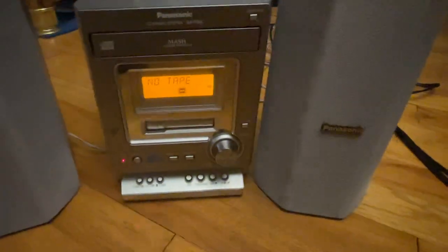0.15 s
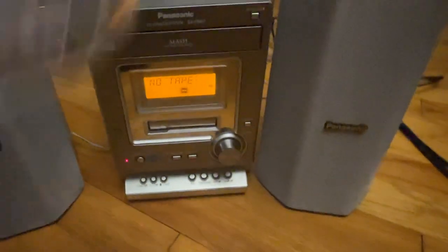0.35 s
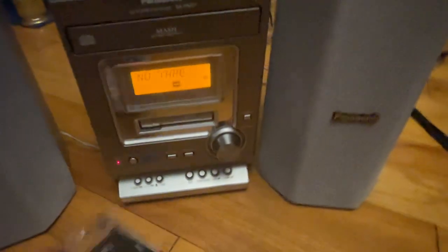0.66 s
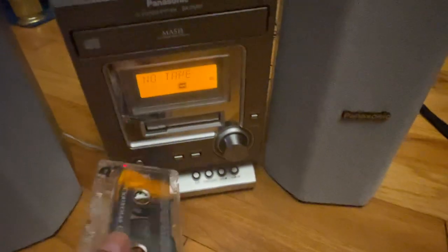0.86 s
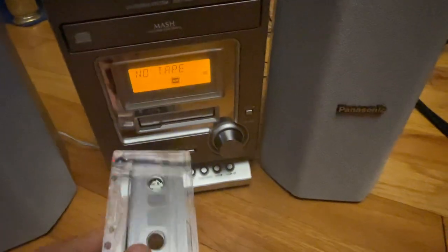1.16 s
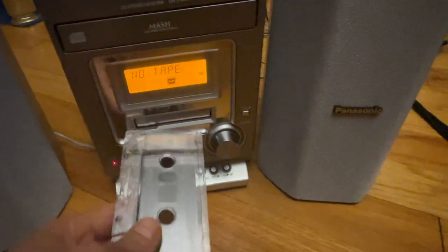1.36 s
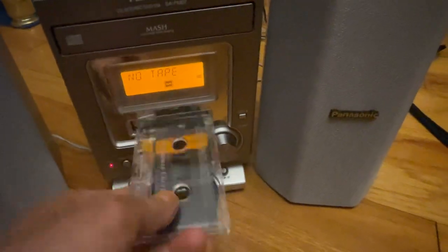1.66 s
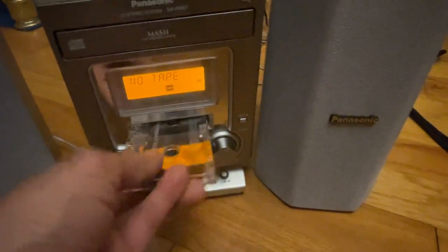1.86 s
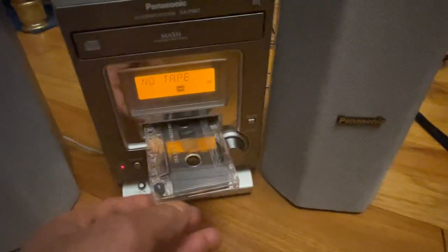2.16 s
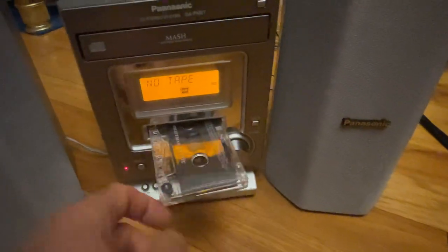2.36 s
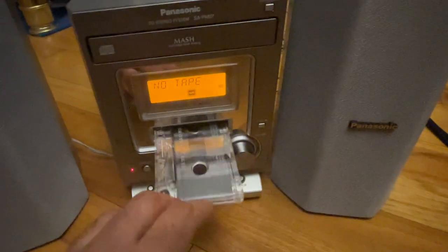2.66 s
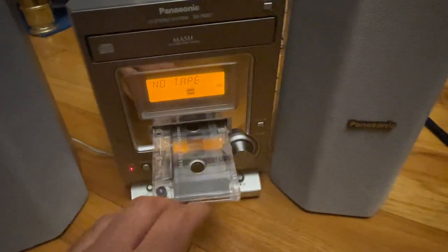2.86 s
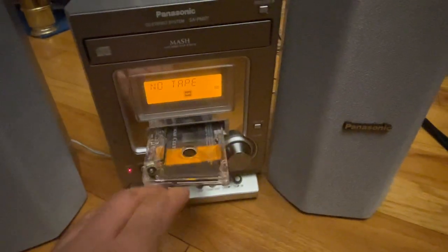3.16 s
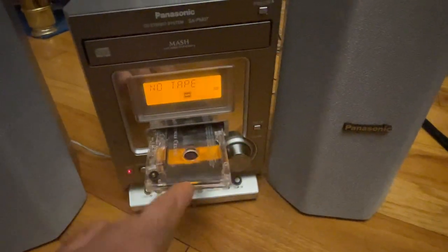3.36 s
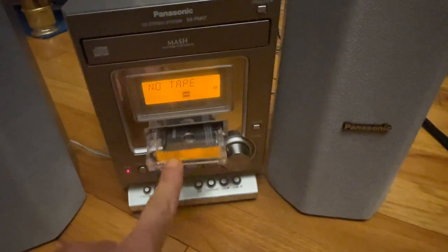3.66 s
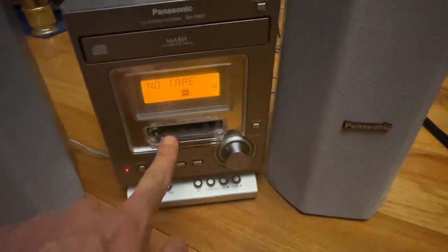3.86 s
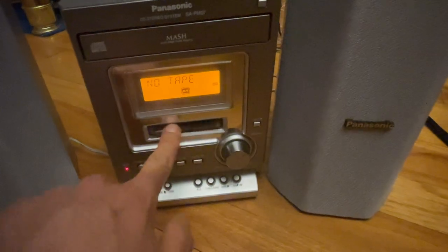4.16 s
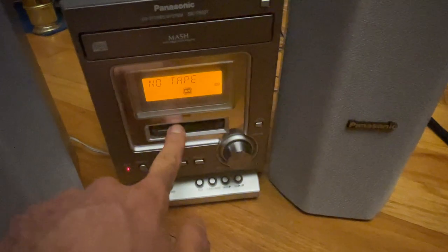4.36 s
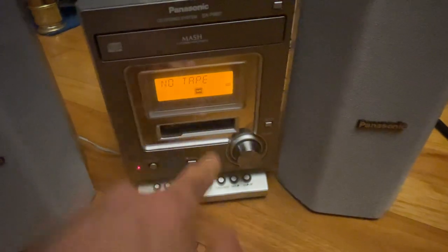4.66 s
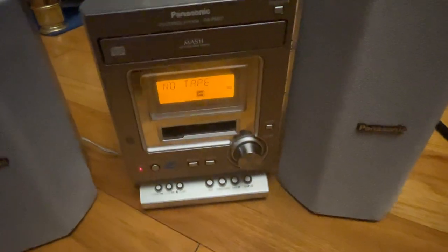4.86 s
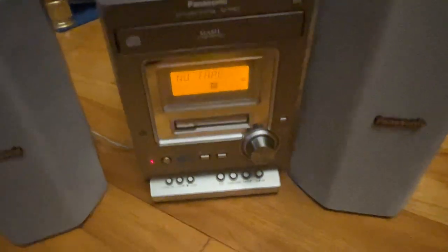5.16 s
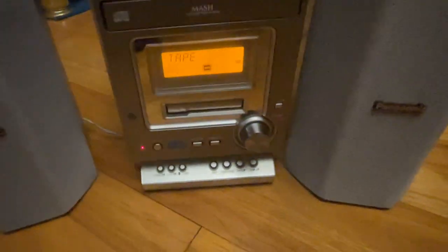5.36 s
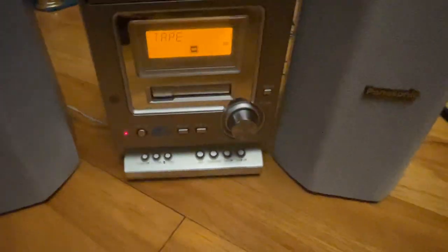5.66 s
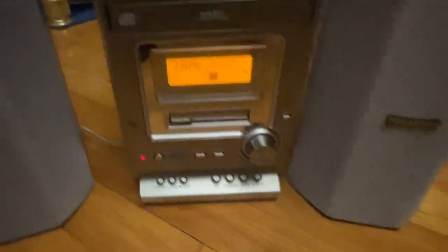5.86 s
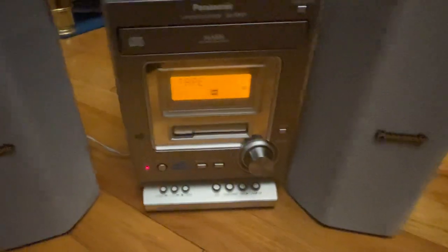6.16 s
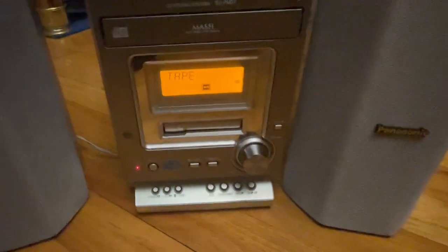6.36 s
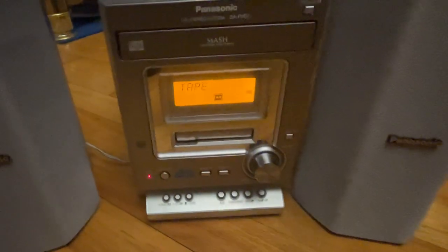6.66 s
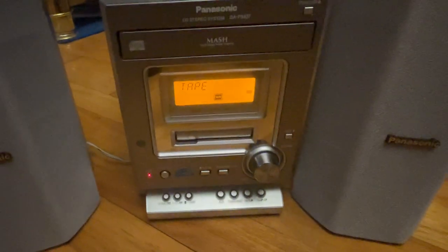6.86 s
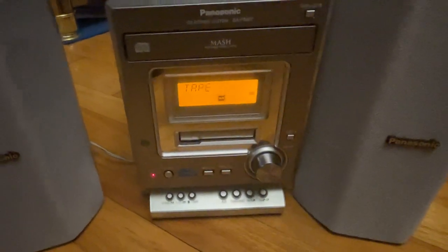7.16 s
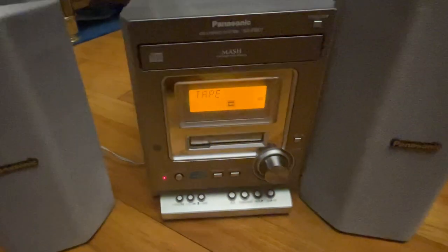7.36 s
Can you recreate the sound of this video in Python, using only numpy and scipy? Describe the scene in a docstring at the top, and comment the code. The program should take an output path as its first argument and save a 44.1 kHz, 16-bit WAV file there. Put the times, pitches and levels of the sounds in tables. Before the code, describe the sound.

A cassette shell is turned in the fingers with soft rustles, then knocks sharply against a plastic slot in a quick uneven clatter. Spaced clicks, short scrapes and knocks continue while it is pushed home. A loading motor whirrs very softly, and the mechanism drops with clacks and a dull thud. The room is quiet, with low rumble and a short reverb; microphones are close, the left hearing it slightly first. A small tap ends it.

```python
"""A cassette drawn into a deck

A plastic cassette is turned in the hand, fiddled into the slot of a deck on a wooden floor and pushed in;
the loading motor draws it in and the mechanism drops it home with a thump. Contacts are noise bursts
ringing resonant modes, tocks, hums and thumps are sines, and rubbing and whirr are shaped noise.
A quiet room rumbles and hisses. The sound reaches the left microphone a little before the right.
"""
import sys
import numpy as np
from scipy import signal
from scipy.fft import rfft, irfft, next_fast_len
from scipy.io import wavfile
from scipy.ndimage import uniform_filter1d, map_coordinates

SR = 44100
rng = np.random.default_rng(int(sys.argv[2]) if len(sys.argv) > 2 else 0)


def gain_from_db(level_db):
    """Turn a decibel level (scalar or array-like) into a linear amplitude factor."""
    decades = np.asarray(level_db, float) / 20
    return 10 ** decades


def store_wav(level_fs):
    """Save 16-bit WAV to argv[1]."""
    pcm = np.round(np.clip(np.atleast_2d(level_fs), -1, 1) * 32767)
    wavfile.write(sys.argv[1], SR, pcm.T.astype(np.int16))


N = 331191  # length [samples]

# rumble of the house: (time [s], level [dB])
HOUSE_RUMBLE = [(0, -58), (1.15, -63.5), (2.3, -59.5), (4.3, -57.5), (5.4, -59), (6.6, -61.5), (7.5, -60.5)]
# relative spectra of rumble, drone and hiss: (frequency [Hz], density [dB])
DEEP_SPECTRUM = [(20, -32.5), (27, -35), (42, -8), (65, -3), (155, -13), (170, -34), (370, -120)]
DRONE_SPECTRUM = [(82, -61), (140, 3), (236, 5.5), (259, -1), (366, -5), (443, -27), (600, -28),
                  (1320, -120)]
HISS_SPECTRUM = [(260, -23.5), (450, -8.5), (596, -13), (1310, -19.5), (13000, -26)]
# brief swells of the drone: (start [s], length [s], level [dB])
DRONE_SWELLS = [(1.654, 0.52, -58), (5.287, 0.22, -58)]
HISS_DB, DRONE_OVER_DEEP_DB = -79.5, -4.5
SWELL_RISE_DB_PER_S, SWELL_FADE_DB_PER_S = 307, 112.5

# plastic rubbing on skin, slot and guides: (start [s], length [s], hiss level [dB], body over hiss [dB])
RUB_STROKES = [(0, 0.057, -63.5, 1), (0.114, 0.11, -70, 3.5), (0.244, 0.034, -62.5, -10),
               (0.32, 0.11, -70, -10.5), (0.421, 0.046, -62, -4), (0.49, 0.17, -79, 0),
               (0.663, 0.093, -56, -10), (0.812, 0.13, -60, -12), (1.012, 0.083, -64, -29),
               (1.62, 0.11, -56, -3.5), (1.891, 0.029, -44.5, -6.5), (1.95, 0.092, -66, 7.5),
               (2.034, 0.082, -52, 3.5), (2.084, 0.18, -67.5, 10.5), (2.484, 0.13, -57.5, 3),
               (2.739, 0.097, -64.5, 6.5), (3.057, 0.05, -52, 4.5), (3.15, 0.17, -64, 8.5),
               (3.428, 0.047, -69, 6.5), (3.56, 0.09, -75, -3), (3.633, 0.049, -59, -0.5),
               (3.736, 0.22, -62, 3), (3.845, 0.14, -64, -0.5), (3.99, 0.18, -72, 2),
               (4.174, 0.013, -42.5, 2), (4.227, 0.12, -68, 8), (4.368, 0.41, -65.5, 2.5),
               (5.129, 0.19, -51.5, 4), (5.311, 0.059, -71.5, 18.5), (5.726, 0.059, -76.5, -2.5),
               (6.062, 0.068, -72.5, 0), (6.332, 0.044, -64, -5.5), (7.257, 0.05, -60, 6),
               (7.377, 0.17, -77, 1)]
# loading motor: (start [s], length [s], hiss level [dB], body over hiss [dB])
MOTOR_WHIRRS = [(4.637, 0.048, -56.5, -4), (4.828, 0.64, -70, 4.5), (5.458, 1.22, -81, 2.5)]
# relative spectrum of the sliding noise: (frequency [Hz], density [dB])
SLIDE_SPECTRUM = [(900, -41), (1500, -11), (2300, -5), (3300, -10.5), (5000, -4), (6400, -12),
                  (8100, -10.5), (10000, -15), (13000, -21.5)]
RUB_RISE_DB_PER_S, RUB_FADE_DB_PER_S = 697.5, 252

# modes of shell and slot: (frequency [Hz], least width [Hz], relative level [dB])
SHELL_MODES = [(265, 39, 4.5), (400, 4, 2.5), (448, 110, -1), (833, 86, -2), (958, 80, -4),
               (1480, 530, 1.5), (2350, 310, -9), (3760, 1100, -2.5), (5610, 440, 1.5), (6220, 88, 7),
               (7200, 390, 0), (10500, 2900, 1.5), (12850, 200, 2.5)]
# how the cassette sits, from each time on:
# (time [s], pitch of the hollow it leaves [Hz], hollow level [dB], ring of the shell [dB])
SEATING_STATES = [(0, 2030, 4, -5), (1.4, 2384, 1.5, 2.5), (2.1, 3790, 8.5, 3), (2.51, 2210, -6, 2),
                  (2.71, 3040, 5.5, -1.5), (2.9, 2350, -18.5, 3), (3.6, 2296, 8.5, -2),
                  (4.0, 2350, -2.5, -2), (5.2, 3360, 13, -2.5), (5.24, 2500, -9, -1.5),
                  (5.5, 1690, 5, -11.5)]
HOLLOW_WIDTH_HZ, HOLLOW_UNDER_HISS_DB = 220, -11

# contacts where one hollow note stands clear: (time [s], level before decay [dB], pitch [Hz], t60 [s])
TOCK_NOTES = [(0.109, -50.5, 1880, 0.053), (0.268, -44, 1487, 0.04), (.684, -44, 624, 0.039),
              (.75, -41.5, 2044, 0.072), (.82, -38.5, 2050, 0.024), (1.087, -45, 1257, .03),
              (1.474, -30.5, 265, 0.079), (1.609, -33, 265, 0.068), (1.729, -26.5, 445, 0.051),
              (1.771, -30, 265, 0.17), (1.806, -30.5, 265, 0.11), (1.937, -39, 265, 0.13),
              (2.06, -16, 940, .05), (2.066, -39, 140, .2), (2.725, -29.5, 539, 0.048),
              (3.271, -44, 376, 0.32), (3.277, -42.5, 237, 0.14), (4.216, -30.5, 265, 0.079),
              (4.523, -42, 422, 0.064), (5.153, -31, 252.6, 0.072), (5.283, -41.5, 177.5, 0.4),
              (5.712, -53, 880, 0.033), (5.835, -44.5, 760, 0.029), (7.252, -20.5, 1495, 0.0076),
              (7.255, -37.5, 221, 0.051), (7.38, -42.5, 250, 0.094)]
TOCK_RISE_CYCLES = 1

# contacts of shell, flap and mechanism:
# (time [s], loudest 4 ms of click band [dB], weight [dB], snap over click [dB], rattle t60 before limits [s])
CONTACT_EVENTS = [(0.267, -71, -6, -5, 0.027), (0.461, -62, 0, 10, 0.014),
                  (0.666, -53.5, -1.5, 12.5, 0.043), (0.686, -58.5, -14, 8, 0.095),
                  (0.724, -58, -10, 6.5, 0.057), (0.744, -38.5, -16, 5.5, 0.031),
                  (0.774, -69, -20, 21.5, 0.019), (0.823, -50, -16, -9, 0.014),
                  (1.086, -61, -11, -3.5, 0.026), (1.469, -44.5, 4, -6, 0.05), (1.504, -53, -3, 5, 0.026),
                  (1.605, -44, 5, -2.5, 0.026), (1.641, -44, 8, 3.5, 0.037), (1.656, -43.5, 0, 2, 0.034),
                  (1.726, -40.5, 11, -1.5, 0.038), (1.746, -41.5, -15, 1.5, 0.046),
                  (1.765, -29, -0.5, -1, 0.03), (1.779, -50, 0, -7, 0.03), (1.801, -36, 3.5, 2, 0.04),
                  (1.852, -41.5, 0.5, -5.5, 0.04), (1.916, -34, -1.5, 2, 0.065),
                  (1.935, -33.5, -1, 0, 0.03), (1.978, -44, -1, 0, 0.063), (2.026, -48.5, 4, 3, 0.07),
                  (2.046, -31.5, -8, 0, 0.079), (2.053, -32.5, -4, 4.5, 0.055), (2.06, -29, -2, -10, 0.076),
                  (2.065, -25, -10, 2, 0.027), (2.123, -33.5, -5, -1, 0.048),
                  (2.161, -41.5, -0.5, 5, 0.048), (2.187, -44.5, -4, -4, 0.014),
                  (2.359, -65.5, 12, -2.5, 0.043), (2.472, -38.5, -1.5, 1, 0.035),
                  (2.494, -65.5, 17.5, 6, 0.17), (2.531, -43.5, 2, 2, 0.029), (2.589, -50, 4, 1, 0.045),
                  (2.636, -55.5, 4.5, -1.5, 0.083), (2.697, -47, 2.5, 2, 0.049),
                  (2.723, -34.5, 2.5, 0.5, 0.02), (2.728, -34, -0.5, 5, 0.029), (3.029, -52, 5, 1, 0.062),
                  (3.047, -41, -2.5, -10, 0.036), (3.084, -45.5, 3, 8, 0.015),
                  (3.102, -49.5, 0, 12.5, 0.041), (3.107, -31.5, -2, 2.5, 0.044),
                  (3.23, -53.5, -12, -2, 0.043), (3.251, -46.5, 0.5, -8, 0.067), (3.267, -44, 1, 0, 0.052),
                  (3.42, -61.5, 8.5, -1.5, 0.076), (3.662, -47.5, -3.5, -4, 0.061),
                  (3.685, -54.5, 5.5, 0, 0.12), (3.712, -53, 0.5, 2.5, 0.097),
                  (3.769, -40.5, -28, 0, 0.015), (3.885, -41, -18, 1.5, 0.073),
                  (3.892, -37, -8, -2, 0.0286), (3.907, -38.5, -6, -7, 0.027), (3.92, -51.5, 4, 2, 0.16),
                  (4.068, -78, 22.5, -15, 0.19), (4.17, -34, -3.5, 0.5, 0.054),
                  (4.222, -48, 5.5, -10, 0.022), (4.266, -41.5, -26, -4, 0.019),
                  (4.376, -48.5, -0.5, 2.5, 0.045), (4.476, -28.5, -7.5, -2.5, 0.031),
                  (4.516, -34, 2, -8, 0.048), (4.597, -47, 3.5, -6, 0.24), (4.616, -45.5, 3, 6.5, 0.051),
                  (4.623, -34, -3.5, 0.5, 0.04), (4.637, -43.5, 0, 6, 0.14), (5.02, -60.5, 0, -8, 0.061),
                  (5.083, -53.5, -3, -13, 0.041), (5.124, -39, -0.5, -18, 0.018),
                  (5.131, -33, -4.5, -2.5, 0.13), (5.149, -34, -0.5, 0.5, 0.029),
                  (5.212, -35.5, -15, -4.5, 0.021), (5.255, -36, -2, -1, 0.11),
                  (5.264, -26.5, -7, -7, 0.052), (5.277, -44.5, 5.5, 7, 0.061),
                  (6.323, -51.5, -15, 1, 0.012), (7.219, -63.5, -1.5, -17.5, 0.026),
                  (7.253, -60, -2, -10, 0.0062), (7.384, -57.5, -13, 0.5, 0.008)]
# limits of the knock, clack, click, snap and fizz bands: (edge [Hz])
CONTACT_BAND_EDGES = [200, 600, 1500, 4000, 9000, 16000]
# additional decay of those five bands, faster in the higher ones: (decay [dB/s])
BAND_DAMPING = [0, 100, 250, 500, 600]
# a heavy contact lifts the lowest band most
KNOCK_PER_WEIGHT, CLACK_PER_WEIGHT, KNOCK_DB = 1.3, 0.44, -2
FIZZ_DB, FIZZ_PER_EDGE = -9, 2  # a sharp edge lifts the highest band most
MODE_SCATTER_DB = 2  # from hit to hit

# faint pure hums: (start [s], length [s], rms level [dB], pitch [Hz])
HUM_SWELLS = [(.92, 0.029, -61, 223.3), (1.06, 0.035, -60.5, 217), (1.113, 0.073, -66.5, 199.3),
              (6.674, 0.052, -58, 234)]

# jolts of the cabinet: (time [s], level to which the modes are relative [dB])
CABINET_JOLTS = [(3.116, -45.5), (4.215, -50), (4.631, -48.5), (5.138, -50.5), (5.275, -36), (7.256, -53.5),
                 (7.38, -57)]
# modes of the cabinet on the floor boards: (frequency [Hz], relative level [dB], t60 [s])
CABINET_MODES = [(74.8, 2.5, 0.48), (137.6, 5, 0.26), (275, -8, 1), (393, -17, 0.97)]

# decay of the room: (frequency [Hz], t60 [s])
ROOM_DECAY = [(200, 0.64), (1000, 0.18), (4000, 0.15), (12000, 0.063)]
ROOM_LOW_HZ = 280  # below this the two sides hear little separate echo

# balance, left over right: (frequency [Hz], gain [dB])
LEFT_OVER_RIGHT = [(250, -0.9), (700, 2.5), (2500, 0), (5000, 0.7), (9000, -0.37)]
# response of both microphones: (frequency [Hz], gain [dB])
MICROPHONE_RESPONSE = [(12600, 1.5), (13400, 0), (14700, -18.5), (15700, 1.5), (16300, -33.5)]
# phase lead of left over right: (frequency [Hz], lead [samples])
LEFT_PHASE_LEAD = [(300, 15), (1380, 13.96), (3100, 17.76), (3960, 16.1), (4650, 18.3), (5680, 19.5),
                   (7060, 21), (13000, 18.6)]


def unit(x):
    """Power normalisation: scales a signal to rms 1."""
    return x / np.sqrt(np.mean(x ** 2) + 1e-20)


def along(points, hz):
    """Logarithmic frequency scale: reads (Hz, value) points by interpolation in log frequency."""
    f, v = np.transpose(points)
    return np.interp(np.log(hz + 1), np.log(f + 1), v)


def wobble(rate):
    """Slow random modulation: a smooth curve through random knots, rate of them a second."""
    knots = rng.standard_normal(int(N * rate / SR) + 4)
    return map_coordinates(knots, [np.arange(N) * rate / SR])


def filtered(x, response):
    """Linear filtering: multiplies the spectrum by a complex response of frequency."""
    m = next_fast_len(N + SR // 2)
    return irfft(rfft(x, m) * response(np.fft.rfftfreq(m, 1 / SR)), m)[..., :N]


def resonance(hz, centre_hz, width_hz):
    """Damped harmonic oscillator: causal response of one mode, 1 at its centre."""
    return 1j * hz * width_hz / (centre_hz ** 2 - hz ** 2 + 1j * hz * width_hz)


def rush(gain, alike):
    """Partial coherence: stereo noise of rms 1 whose power share alike is common to both sides."""
    noise = rng.standard_normal((3, N))
    share = np.clip(alike, 0, 1)
    both = np.sqrt(share) * noise[0] + np.sqrt(1 - share) * noise[1:]
    return unit(filtered(both, gain))


def strokes(start, length, db, rise_db_per_s, fade_db_per_s):
    """Exponential growth and decay: summed envelopes that swell, hold for their length and fade."""
    step = 44  # samples between computed points
    at = np.arange(0, N + step, step)
    t = at / SR - start[:, None]
    before, after = np.maximum(-t, 0), np.maximum(t - length[:, None], 0)
    under_db = rise_db_per_s * before + fade_db_per_s * after
    return np.interp(np.arange(N), at, gain_from_db(db[:, None] - under_db).sum(axis=0))


def seating(s):
    """Boundary conditions set the resonances: hollow pitch, hollow level and shell ring at times s."""
    start, *cols = np.transpose(SEATING_STATES)
    state = np.maximum(np.searchsorted(start, s, "right") - 1, 0)
    return [c[state] for c in cols]


def rumble():
    """Diffuse background noise: rumble and drone nearly alike on both sides, over a faint unrelated hiss."""
    time, db = np.transpose(HOUSE_RUMBLE)
    deep_db = np.interp(np.arange(N) / SR, time, db)
    swells = strokes(*np.transpose(DRONE_SWELLS), SWELL_RISE_DB_PER_S, SWELL_FADE_DB_PER_S)
    drone_level = gain_from_db(deep_db + DRONE_OVER_DEEP_DB) + swells
    deep_noise = rush(lambda hz: gain_from_db(along(DEEP_SPECTRUM, hz)), alike=0.9)
    deep = gain_from_db(deep_db + 0.21 * wobble(3.6)) * deep_noise
    drone_noise = rush(lambda hz: gain_from_db(along(DRONE_SPECTRUM, hz)), alike=0.9)
    drone = drone_level * gain_from_db(1.5 * wobble(9)) * drone_noise
    hiss = gain_from_db(HISS_DB) * rush(lambda hz: gain_from_db(along(HISS_SPECTRUM, hz)), alike=0.045)
    return deep + drone + hiss


def sliding():
    """Friction excites resonances: grainy noise rings shell and hollow; the motor adds a brighter whirr."""
    rubs, whirrs = np.transpose(RUB_STROKES), np.transpose(MOTOR_WHIRRS)
    # each change of seating is spread over 20 ms
    hollow_hz, hollow_db, ring_db = uniform_filter1d(seating(np.arange(N) / SR), size=SR // 50, axis=1)
    grain = gain_from_db(1.8 * wobble(250) + 0.9 * wobble(35))  # the rubbing is uneven

    def ringing(hz):
        return sum(gain_from_db(db) * resonance(hz, c, max(w, c / 25)) for c, w, db in SHELL_MODES)

    def rung(x):
        direct = 0.5
        mixed = direct * x + gain_from_db(ring_db) * unit(filtered(x, ringing))
        return unit(grain * mixed / np.hypot(direct, gain_from_db(ring_db)))

    def level(rows, db):
        return strokes(rows[0], rows[1], db, RUB_RISE_DB_PER_S, RUB_FADE_DB_PER_S)

    hiss = rung(rush(lambda hz: gain_from_db(along(SLIDE_SPECTRUM, hz)), alike=0.35))
    body = rung(rush(lambda hz: resonance(hz, 1100, 1700) ** 2, alike=0.78))
    # slow noise times a sine makes a narrow band around the hollow's pitch
    slow = rush(lambda hz: 1 / (1 + (2 * hz / HOLLOW_WIDTH_HZ) ** 2), alike=0.7)
    carrier = np.sin(2 * np.pi * np.cumsum(hollow_hz) / SR)
    hollow = gain_from_db(hollow_db + HOLLOW_UNDER_HISS_DB) * grain * slow * carrier
    # brighter than the rubbing, and without its grain
    whirr = rush(lambda hz: gain_from_db(along(SLIDE_SPECTRUM, hz)) * (1 + hz / 6000), alike=0.4)
    body_level = sum(level(rows, rows[2] + rows[3]) for rows in (rubs, whirrs))
    return level(rubs, rubs[2]) * (hiss + hollow) + level(whirrs, whirrs[2]) * whirr + body_level * body


def tocks():
    """Free damped vibration: one slightly rough note that takes a cycle or so to build, then decays."""
    s, db, hz, t60 = np.transpose(TOCK_NOTES)[:, :, None]
    t = np.arange(SR // 4) / SR
    steps = rng.standard_normal((len(s), len(t)))
    drift = 0.00016 * hz * np.cumsum(steps, axis=1)  # phase; higher notes are rougher
    envelope = gain_from_db(db - 60 * t / t60) * (1 - np.exp(-t * hz / TOCK_RISE_CYCLES))
    note = envelope * np.sin(2 * np.pi * hz * t + drift)
    at = (np.round(s * SR) + np.arange(len(t))).astype(int)
    return np.bincount(at.ravel(), note.ravel(), N + SR)[:N]


def contacts():
    """Impact excites modes: a rattle of tiny collisions rings the shell at new strengths and the slot's hollow."""
    s, click, weight, edge, t60 = np.transpose(CONTACT_EVENTS)
    knock = click + KNOCK_DB + KNOCK_PER_WEIGHT * weight
    clack = click + CLACK_PER_WEIGHT * weight
    fizz = click + FIZZ_DB + FIZZ_PER_EDGE * edge
    levels = knock, clack, click, click + edge, fizz
    count, size = len(s), 8192
    t, hz = np.arange(size) / SR, np.fft.rfftfreq(size, 1 / SR)

    life = np.clip(t60, 0.004, 0.12)[:, None]
    build = (1 - np.exp(-t / (0.033 * life))) ** 2  # long rattles also build up more slowly
    shape = gain_from_db(-60 * t / life) * build
    clumps = rng.standard_normal((count, size // 32))
    lumps = gain_from_db(4.5 * np.repeat(clumps, 32, axis=1))  # collisions come in uneven clumps
    rattle = rng.standard_normal((count, size)) * lumps * shape

    centre, width, level = np.transpose(SHELL_MODES)[:, :, None]
    hollow_hz, hollow_db, ring_db = np.array(seating(s))[:, :, None]
    strength, shift = rng.standard_normal((2, count, len(SHELL_MODES), 1))
    varied = centre * (1 + 0.02 * shift)  # mode pitches vary at random by about 2 % from hit to hit
    mode_gain = gain_from_db(level + ring_db[:, :, None] + MODE_SCATTER_DB * strength)
    modes = mode_gain * resonance(hz + 1, varied, np.maximum(width, centre / 40))
    peaks = np.column_stack([centre, level])
    smooth = gain_from_db(along(peaks, hz) - 2.5)  # the many weak modes between the peaks
    hollow = gain_from_db(hollow_db) * resonance(hz + 1, hollow_hz, HOLLOW_WIDTH_HZ)
    rung = irfft(rfft(rattle) * (smooth + modes.sum(axis=1) + hollow), size)

    hits = np.zeros_like(rung)
    bands = zip(CONTACT_BAND_EDGES, CONTACT_BAND_EDGES[1:], levels, BAND_DAMPING)
    for low, high, db, damping_db in bands:
        band_pass = signal.butter(2, [low, high], "bandpass", fs=SR, output="sos")
        band = signal.sosfilt(band_pass, rung)
        band = band * gain_from_db(-damping_db * t) * np.cos(np.pi / 2 * t / t[-1])
        power = uniform_filter1d(band ** 2, size=SR // 250, axis=1)  # over 4 ms
        loudest = power.max(axis=1, keepdims=True)
        hits *= -1  # neighbouring bands alternate in sign so that they join without a gap
        hits += gain_from_db(db)[:, None] * band / np.sqrt(loudest)

    # every contact sits at its own spot: a slightly different balance and arrival on the two sides
    balance, delay = rng.standard_normal((2, count, 1))
    at = np.round(s * SR)[:, None] + np.arange(size)
    sides = [(at, gain_from_db(0.7 * balance)), (at + np.round(0.4 * delay), gain_from_db(-0.7 * balance))]
    return np.array([np.bincount(i.astype(int).ravel(), (g * hits).ravel(), N + size)[:N]
                     for i, g in sides])


def hums():
    """Simple harmonic motion: short soft swells of a single low tone."""
    t = np.arange(N) / SR
    out = np.zeros(N)
    for start, length, db, hz in HUM_SWELLS:
        swell = strokes(*np.array([[start], [length], [db]]), rise_db_per_s=280, fade_db_per_s=330)
        out += swell * np.sqrt(2) * np.sin(2 * np.pi * hz * t)
    return out


def thumps():
    """Modal superposition: heavier blows rock the whole cabinet, which rings low."""
    out, t = np.zeros(N + SR), np.arange(SR // 2) / SR
    for s, db in CABINET_JOLTS:
        ring = sum(gain_from_db(level + rng.normal(0, 0.66) - 60 * t / t60) * np.sin(2 * np.pi * hz * t)
                   for hz, level, t60 in CABINET_MODES)
        out[round(s * SR):][:len(t)] += gain_from_db(db) * ring * (1 - np.exp(-t / 0.0047))
    return out[:N]


def room(x):
    """Reverberation: each frequency dies at its own speed; a fresh random tail is crossfaded in every 0.2 s."""
    step, first = SR // 5, 150  # renewal of the tail and delay of the echo [samples]
    out, padded = np.zeros((2, N + 2 * SR)), np.pad(x, (step, 2 * step))
    fade = signal.get_window("hann", 2 * step)
    for start in range(0, N + step, step):
        hz, t, z = signal.stft(rng.standard_normal((2, SR // 2)), SR, nperseg=256)
        decay = gain_from_db(-60 * t / along(ROOM_DECAY, hz)[:, None])
        tail = signal.istft(z * decay, SR, nperseg=256)[1]
        part = padded[start:start + 2 * step] * fade
        wet = signal.fftconvolve(part[None], tail / np.linalg.norm(tail[0]), axes=1)
        out[:, start + first:start + first + wet.shape[1]] += wet
    return out[:, step:step + N]


def scene():
    """Superposition of sound pressures: the deck close in front, its echo and the room's own noise."""
    deck = contacts() + tocks()
    echo = room(filtered(deck.mean(axis=0), lambda hz: 1j * hz / (ROOM_LOW_HZ + 1j * hz)))
    return rumble() + sliding() + deck + hums() + thumps() + gain_from_db(-7.5) * echo


def roll_off(x):
    """The treble ends steeply here."""
    return signal.sosfilt(signal.butter(12, 16480, fs=SR, output="sos"), x)


def record(dry):
    """Interchannel differences: the left hears earlier and fuller in the middle range; the treble rolls off."""
    halves = np.array([[0.5], [-0.5]])  # each side takes half of every difference

    def response(hz):
        colour = gain_from_db(halves * along(LEFT_OVER_RIGHT, hz) + along(MICROPHONE_RESPONSE, hz))
        lead = np.exp(2j * np.pi * halves * hz * along(LEFT_PHASE_LEAD, hz) / SR)
        return colour * lead

    return roll_off(filtered(dry, response))


dry = scene()
out = record(dry)
store_wav(out)
```